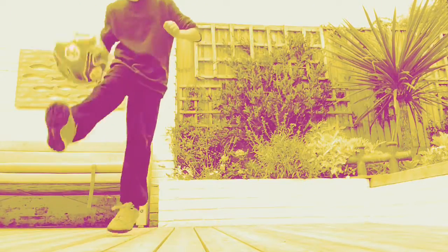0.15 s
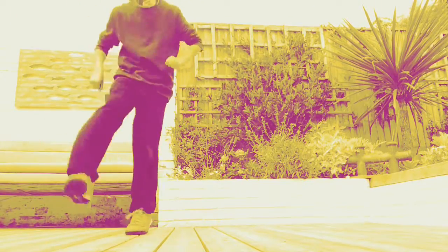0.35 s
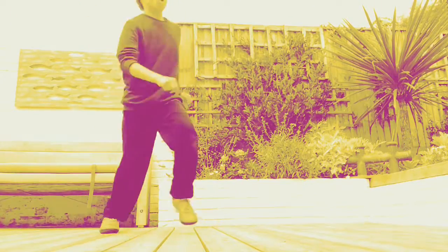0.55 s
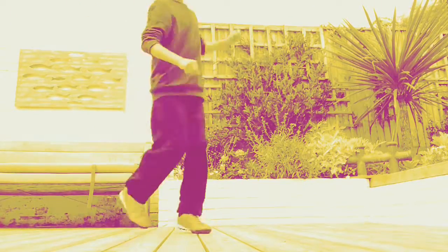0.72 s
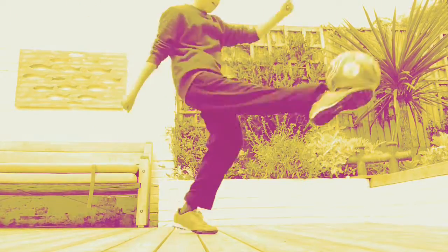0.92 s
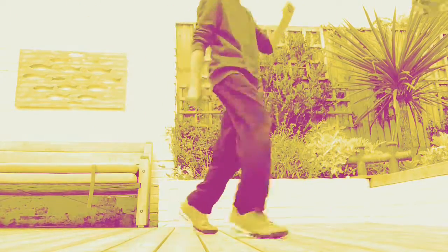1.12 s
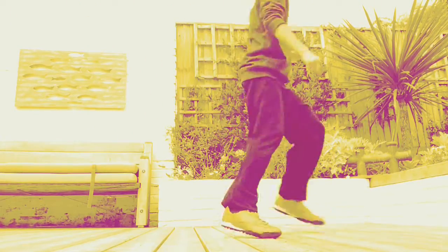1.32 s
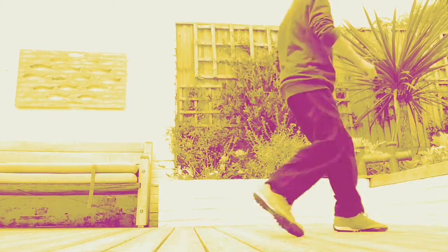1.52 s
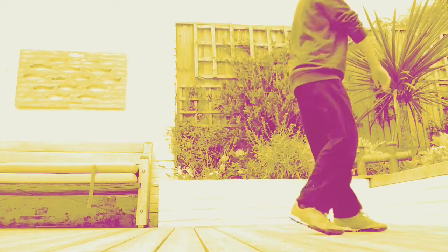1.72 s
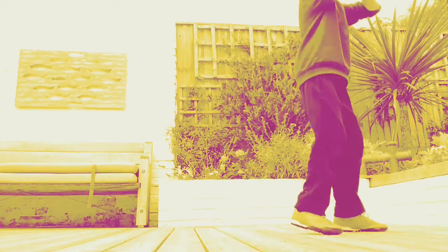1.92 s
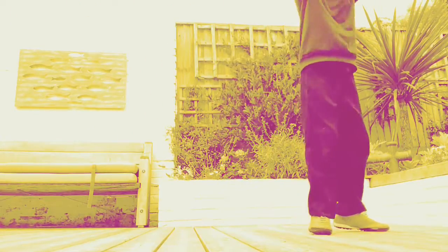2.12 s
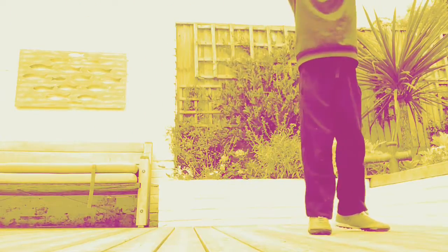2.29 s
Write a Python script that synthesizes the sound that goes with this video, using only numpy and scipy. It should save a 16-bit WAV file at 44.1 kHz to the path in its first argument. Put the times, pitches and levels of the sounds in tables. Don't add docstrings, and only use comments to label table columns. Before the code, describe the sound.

Football kicks thud and crack above hollow wooden deck footsteps, with faint traffic far behind

```python
import sys
import numpy as np
from scipy import signal
from scipy.fft import rfft, irfft, next_fast_len
from scipy.io import wavfile
from scipy.ndimage import map_coordinates

SR = 44100
rng = np.random.default_rng(int(sys.argv[2]) if len(sys.argv) > 2 else 0)


def volts_from_decibels(level):
    exponent = np.asarray(level, float) / 20
    return 10 ** exponent


def store_wav(level_fs):
    pcm = np.round(np.clip(np.atleast_2d(level_fs), -1, 1) * 32767)
    wavfile.write(sys.argv[1], SR, pcm.T.astype(np.int16))


N = 103635


def unit(x):
    return x / np.sqrt(np.mean(x ** 2) + 1e-20)


def along(points, hz):
    f, v = np.transpose(points)
    return np.interp(np.log(hz + 1), np.log(f + 1), v)


def wobble(rate, size=N):
    knots = rng.standard_normal(int(size / 40) + 4)
    return map_coordinates(knots, [np.arange(size) * rate / SR])


def filtered(x, response):
    m = next_fast_len(len(x) + 8192)
    hz = np.fft.rfftfreq(m, 1 / SR)
    return irfft(rfft(x, m) * response(hz), m)[:len(x)]


def peak(f, hz, wide_hz):
    return 1j * f * wide_hz / (hz * hz - f * f + 1j * f * wide_hz)


def add(out, s, x):
    part = out[round(s * SR):][:len(x)]
    part += x[:len(part)]


def rings(rows, rise_s, partials):
    unrest_rad, unrest_rate = 0.4, 64
    out = np.zeros(N)
    t = np.arange(SR // 2) / SR
    for s, db, hz, t60 in rows:
        turn = 2 * np.pi * hz * t
        settling_in = np.minimum(t * hz / 2, 1)
        turn = turn + unrest_rad * wobble(unrest_rate, size=len(t)) * settling_in
        x = np.zeros(len(t))
        for ratio, partial_db in [(0.99, 0.005)] + partials:
            x += volts_from_decibels(partial_db - 60 * t * ratio / t60) * np.sin(ratio * turn)
        add(out, s, volts_from_decibels(db) * x * (1 - np.exp(-t / rise_s)) ** 2)
    return out


def bursts(rows, colour):
    grit_db, grit_rate = 0.5, 540
    clump_db, clump_rate = 2.5, 110
    out = np.zeros(N)
    t = np.arange(SR // 2) / SR
    for s, db, hold, t60, *rest in rows:
        lumps_db = grit_db * wobble(grit_rate, size=len(t)) + clump_db * wobble(clump_rate, size=len(t))
        grains = rng.standard_normal(len(t)) * volts_from_decibels(lumps_db)
        body = unit(filtered(grains, lambda f: colour(f, *rest)))
        rise = 1 - np.exp(-t / min(0.004, hold / 2))
        release = volts_from_decibels(db - 60 * np.maximum(t - hold, 0) / t60)
        add(out, s, body * release * rise)
    return out


# t/s, level/dB, f/Hz, t60/s
SOFT_KICK = [(.2017, 9.5, 110, .034)]


def soft_kick():
    return rings(SOFT_KICK, 0.004, [])


# t/s, level/dB, f/Hz, t60/s
THUMPS = [(.2197, -14.5, 102.9, 0.16), (.2405, -30, 141.8, 0.19), (.2585, -24.5, 121.6, 0.12),
          (.36, -44.5, 162, 0.18), (.70, -37, 171.2, 0.14), (.935, -22, 193, 0.13), (.331, -44, 97, 0.13),
          (.518, -26, 59, 0.24), (.655, -32, 79, 0.13), (.912, -15.5, 114, 0.039), (.926, -10, 70, 0.086),
          (.9405, -7, 116, 0.095), (.976, -17, 100, 0.073), (.995, -22, 73.8, 0.31),
          (1.165, -19, 56.5, 0.16), (1.468, -20.5, 80.1, 0.063), (1.556, -25, 120, 0.038),
          (1.572, -20, 103.3, 0.09), (1.673, -24, 98.4, 0.11), (1.730, -25.5, 76.3, 0.071),
          (.74, -45.5, 64.7, .2), (1.615, -31, 69.7, 0.12), (.333, -32, 109, 0.093), (.85, -46, 60, .15),
          (1.34, -46, 55, 0.21), (2.22, -48.5, 75, .2), (1.755, -42.5, 70, 0.075), (1.865, -51, 95, 0.17),
          (2.09, -48.5, 54, .25)]
# ratio, level/dB
JOIST_MODES = [(.62, -11), (1.6, -8)]


def thumps():
    return rings(THUMPS, 0.0016, JOIST_MODES)


KNOCK_RISE_S = 0.00039
# t/s, level/dB, f/Hz, t60/s
KNOCKS = [(.2008, -10.5, 950, 0.0036), (.2555, -36.5, 500, 0.039), (.4655, -21.5, 1110, 0.013),
          (.475, -34.5, 335.5, 0.18), (.49, -36, 170, 0.12), (.204, -21.5, 196, 0.038),
          (.5275, -18, 649, 0.019), (.536, -29, 425, 0.097), (.556, -33.5, 340, 0.11),
          (.654, -19.5, 560, 0.026), (.664, -24.5, 357, 0.11), (.895, -20, 530, 0.017),
          (.915, -21.5, 412, 0.066), (.9293, -13, 700, .015), (.939, -17, 1357, 0.015),
          (.945, -23.5, 346.7, 0.12), (1.1489, -6.5, 962, 0.0092), (1.158, -22.5, 341.6, 0.14),
          (1.175, -27, 276.7, 0.1), (1.427, -20, 713, 0.017), (1.437, -25, 284, 0.035),
          (1.447, -18, 993, 0.017), (1.550, -36, 800, 0.019), (1.570, -32, 663, 0.033),
          (1.667, -27, 940, 0.0091), (1.675, -44, 440, 0.014), (1.4745, -22, 186, 0.021),
          (1.6765, -20.5, 196, 0.011), (.2885, -53, 616, 0.069), (1.17, -27.5, 148.7, 0.17),
          (.9305, -18, 1140, 0.027)]
# ratio, level/dB
OVERTONES = [(1.802, -7), (2.9, -10)]
# ratio, level/dB
SIDE_MODES = [(0.782, -5.5), (1.31, -7)]


def knocks():
    return rings(KNOCKS, KNOCK_RISE_S, OVERTONES + SIDE_MODES)


# t/s, level/dB, f/Hz, t60/s
SNAPS = [
    (.9289, -3.5, 1150, 0.0041),
    (1.1493, -13, 980, .005),
    (1.4478, -19.5, 1083, 0.0045),
]


def snaps():
    return rings(SNAPS, 0.0001, [])


# t/s, level/dB, f/Hz, t60/s
CLEAR = [
    (1.1508, -10, 1220, 0.03),
    (1.455, -18, 292, 0.07),
    (.245, -30.5, 349, 0.13),
    (.9308, -6, 570, 0.022),
]


def clear_rings():
    return rings(CLEAR, KNOCK_RISE_S, [])


# t/s, level/dB, f/Hz, t60/s
CHATTER = [(.898, -30, 480, 0.031), (.911, -27, 1090, .015), (.9425, -19, 2084, .015),
           (.9385, -27, 1620, .02), (.955, -26.5, 1592, .04), (.963, -29.5, 2094, .02),
           (.970, -31.5, 1480, 0.028), (1.151, -23, 2700, 0.022), (1.155, -34, 3730, .015),
           (1.161, -22, 885, 0.027), (1.171, -36, 3670, 0.034), (1.174, -26, 1730, .04),
           (1.181, -26, 1890, 0.03), (1.178, -29, 740, 0.034), (1.200, -39, 1820, 0.032),
           (1.2125, -34.5, 382, .05), (1.443, -29.5, 2290, 0.028), (1.459, -22, 833, 0.02),
           (1.471, -32, 700, 0.027), (1.5735, -44, 450, 0.043), (1.583, -36.5, 700, 0.017),
           (1.6625, -37, 500, 0.023), (1.6685, -26.5, 624, 0.025), (1.6725, -30.5, 782, 0.018),
           (1.70, -42, 2300, .03), (1.72, -50, 1610, .03), (.2895, -36.5, 556, 0.028),
           (.66, -32, 690, 0.038), (.531, -30.5, 640, .05), (.682, -46.5, 1000, .12),
           (1.564, -39.5, 230, .08), (1.60, -42, 310, .12), (1.62, -49.5, 650, .05), (.50, -40.5, 330, .06),
           (.7, -38, 340, .1), (1.19, -30.5, 160, .1), (.896, -30, 1300, 0.012), (1.435, -36.5, 3000, .02),
           (1.452, -33.5, 3290, 0.021), (1.69, -45, 3000, 0.028)]


def chatter():
    return rings(CHATTER, KNOCK_RISE_S, [])


# t/s, level/dB, f/Hz, t60/s
SPRUNG = [(1.481, -25, 294.8, 0.23), (1.497, -29.5, 292.4, 0.15)]


def sprung_board():
    damped_at_s, damping_t60_s = 1.517, 0.025
    late = np.maximum(np.arange(N) / SR - damped_at_s, 0)
    return rings(SPRUNG, KNOCK_RISE_S, []) * volts_from_decibels(-60 * late / damping_t60_s)


# t/s, level/dB, hold/s, release t60/s,
# corner f/Hz
SCUFFS = [(.2008, -28.5, 0.0049, 0.063, 1850), (0.237, -59, 0.032, 0.16, 4730),
          (0.463, -39.5, 0.044, 0.12, 3600), (0.531, -49.5, 0.031, 0.075, 3960),
          (0.657, -42, 0.0095, .15, 1650), (0.784, -65.5, 0.032, 0.18, 3000),
          (0.897, -33, 0.06, 0.061, 2110), (0.928, -14.5, 0.0015, 0.042, 2480),
          (.936, -26.5, 0.0094, 0.11, 2208), (1.148, -27, 0.02, 0.14, 2460),
          (1.429, -36, 0.019, 0.16, 2080), (1.441, -32.5, 0.0071, 0.13, 3000),
          (1.553, -54, 0.012, 0.07, 3000), (1.562, -48.5, 0.004, 0.14, 5300),
          (1.661, -43, 0.019, 0.18, 3750), (1.805, -65, 0.043, .1, 1230), (.96, -41.5, 0.025, 0.54, 2500),
          (.205, -46, 0.046, 0.14, 3220), (.56, -66, 0.036, 0.11, 4500), (2.03, -67, 0.14, .2, 2510),
          (1.133, -48, 0.026, .03, 2500), (1.68, -56.5, 0.038, 0.15, 3000), (1.49, -63, 0.041, 0.07, 4030)]
# f/Hz, width/Hz, level/dB
BOARDS = [(303, 38, 8.5), (640, 142, 5.5), (1150, 370, -6.5), (1711, 280, 0.5), (2526, 600, -3.5),
          (3600, 792, -1)]


def scuffs():
    def wood(f):
        total = volts_from_decibels(-12.5)
        for k, (hz, wide_hz, db) in enumerate(BOARDS):
            total = total + volts_from_decibels(db) * peak(f, hz, wide_hz) * (-1) ** k
        return total

    def rub(f, corner_hz):
        dull = 1 / (1 + 1j * f / corner_hz) ** 2
        thin = 1j * f / (0.1 * corner_hz + 1j * f)
        return wood(f) * dull * thin

    return bursts(SCUFFS, rub)


# t/s, level/dB, hold/s, release t60/s
SLAPS = [
    (.9288, -16, .0008, .010),
    (.9308, -26, .001, .02),
]


def slaps():
    return bursts(SLAPS, lambda f: peak(f, 10900, 6000))


# t/s, level/dB, hold/s, release t60/s
TICKS = [(.204, -44.5, 0.0027, 0.019), (0.62, -55.5, 0.0025, 0.02), (.539, -49.5, 0.0018, 0.011),
         (0.56, -67, 0.0065, 0.033), (1.447, -55, 0.0054, 0.027), (1.567, -58, 0.0061, 0.033),
         (.9305, -25, 0.0018, 0.026), (.934, -45.5, 0.014, 0.3), (0.63, -82, 0.027, 0.11)]


def ticks():
    return bursts(TICKS, lambda f: peak(f, 4740, 3000) ** 2)


# t/s, level/dB, hold/s, release t60/s
FIZZES = [(.203, -58, .006, 0.055), (.243, -63, 0.02, .05), (.467, -60.5, 0.022, .06),
          (.530, -73, .04, .05), (.655, -74, 0.0089, 0.042), (.695, -69, 0.0054, 0.033),
          (.897, -60.5, 0.034, .05), (.933, -36, 0.019, .12), (1.149, -56.5, 0.021, 0.11),
          (1.428, -59, 0.014, 0.046), (1.444, -66.5, 0.015, 0.076), (1.551, -57.5, 0.018, 0.053),
          (1.663, -64, 0.048, 0.12)]


def fizzes():
    return bursts(FIZZES, lambda f: peak(f, 9500, 9220) ** 2)


# f/Hz, t60/s
WALLS = [(80, 0.49), (400, 0.23), (2000, 0.17), (10000, 0.17)]


def walls(x):
    level_db, delay_s, rise_s = -17, 0.006, 0.00594
    out = np.zeros(N)
    step = SR // 4
    for a in range(0, N, step):
        hz, t, z = signal.stft(rng.standard_normal(SR // 2), SR, nperseg=1024)
        dying = volts_from_decibels(-60 * t / along(WALLS, hz)[:, None])
        tail = signal.istft(z * dying, SR, nperseg=1024)[1]
        tail = tail * (1 - np.exp(-np.arange(len(tail)) / SR / rise_s))
        add(out, a / SR + delay_s, signal.fftconvolve(x[a:a + step], tail / np.linalg.norm(tail)))
    return volts_from_decibels(level_db) * out


# f/Hz, level per Hz/dB
TRAFFIC = [(20, -17.5), (60, -1), (105, -4.5), (150, -15), (400, -26), (1100, -30.5), (2500, -39.5),
           (16000, -55)]
# t/s, level/dB
FLOOR = [(0, -67), (.7, -66.5), (1.3, -69.5), (1.751, -67), (1.8, -68), (1.87, -68), (2.1, -69.5),
         (2.35, -70.5)]


def traffic():
    s, db = np.transpose(FLOOR)
    t = np.arange(N) / SR
    rush = unit(filtered(rng.standard_normal(N), lambda f: volts_from_decibels(along(TRAFFIC, f))))
    swell = volts_from_decibels(np.interp(t, s, db) + 17 + wobble(6))
    drone = np.sin(2 * np.pi * 100 * t + 0.5 * wobble(25))
    return rush * swell + drone * volts_from_decibels(-59.5 + 3.4 * wobble(14))


def scene():
    deck = knocks() - thumps() - soft_kick() - snaps()
    deck = deck + clear_rings() + chatter() + sprung_board()
    deck = deck + scuffs() + slaps() + ticks() + fizzes()
    return (deck + walls(deck) + traffic())[None]


def low_pass(x):
    return signal.sosfilt(signal.butter(12, 16320, fs=SR, output="sos"), x)


def record(dry):
    def mic(f):
        bass_cut = (1j * f / 45) ** 2 / (1 + 1j * f / 45) ** 2
        top_cut = volts_from_decibels(-28 * np.clip((f - 15000) / 300, 0, 2))
        return bass_cut * top_cut

    mix = filtered(dry[0], mic)[None]
    return low_pass(mix)


dry = scene()
out = record(dry)
store_wav(out)
```